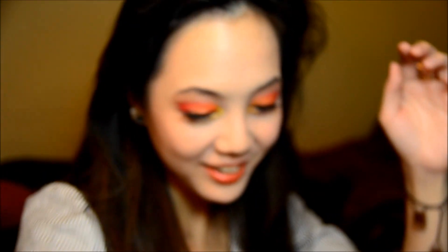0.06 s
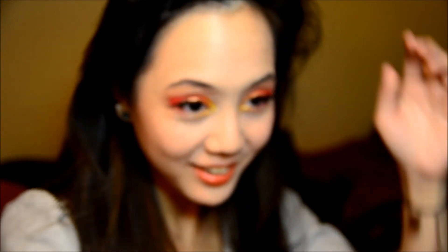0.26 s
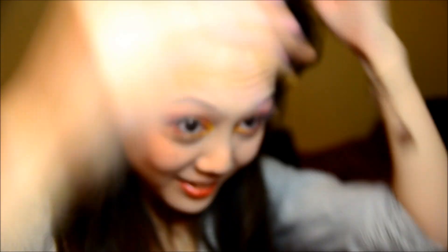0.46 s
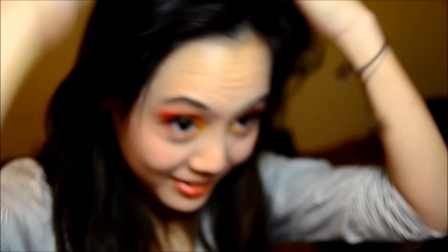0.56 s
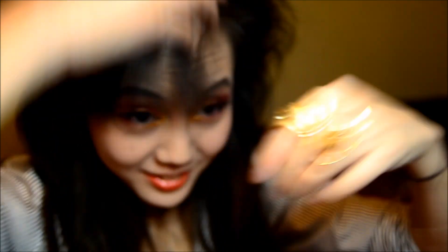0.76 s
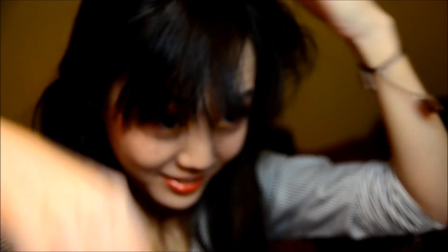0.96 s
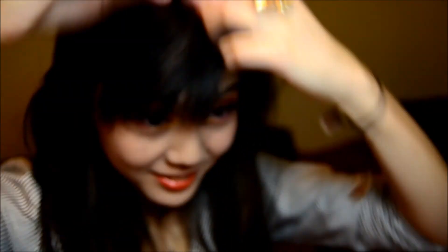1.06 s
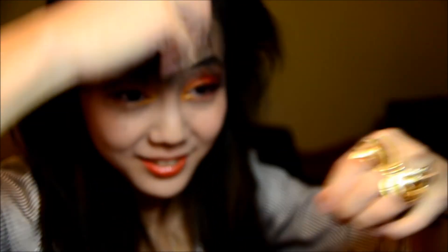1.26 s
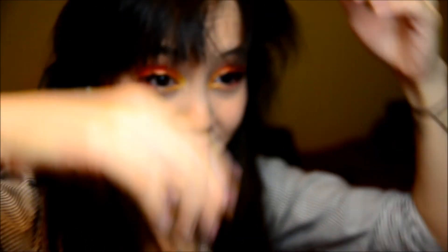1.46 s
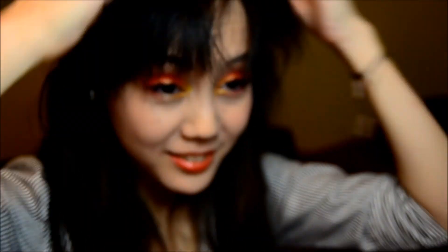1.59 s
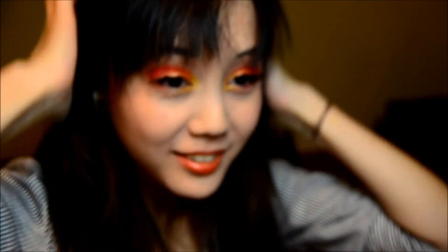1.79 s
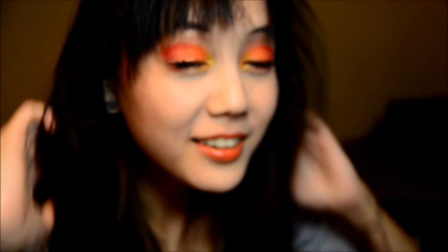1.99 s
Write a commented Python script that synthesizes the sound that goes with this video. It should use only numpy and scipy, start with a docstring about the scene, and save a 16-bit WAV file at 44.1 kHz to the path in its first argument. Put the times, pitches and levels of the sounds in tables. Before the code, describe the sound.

Sharp hard clack of a dropped hair clip, quick uneven clattering with bright ticks, abrupt settling, then near silence with faint hair brushing, low ventilation noise and weak mains hum, picked up by a nearby simple microphone.

```python
"""Hair clip drop and hair swishes

A small spring hair clip snaps open, drops on a hard desk, bounces and rocks to rest near a laptop microphone.
Each blow rings fading tones and adds a noisy knock; short bright noises make the ticks of the teeth.
Hands then sweep through long hair: shaped noise that swells and fades in soft swishes.
Behind it all is a small room with ventilation noise and a wavering mains hum made of sine tones."""
import sys
import numpy as np
from scipy import signal
from scipy.fft import rfft, irfft
from scipy.io import wavfile
from scipy.ndimage import uniform_filter1d

SR = 44100
rng = np.random.default_rng(int(sys.argv[2]) if len(sys.argv) > 2 else 0)


def put_to_file(sound):
    """Save the sound as 16-bit audio at rate SR, in the file named by the first command-line argument."""
    columns = np.atleast_2d(sound).T  # one column per channel
    safe = np.clip(columns, -1, 1)
    whole_steps = np.round(safe * 32767)
    wavfile.write(sys.argv[1], SR, whole_steps.astype(np.int16))


def ratio(d):
    """dB to gain"""
    e = np.asarray(d, float) / 20
    return 10 ** e


N = 89699  # length in samples
T = np.arange(N) / SR  # time in seconds

# Spectrum of the ventilation noise: (frequency [Hz], relative level [dB])
VENTILATION_COLOUR = [(25, -46), (45, -32.5), (80, -16), (130, -10.5), (200, -12.5), (260, -14.5),
                      (400, -9.5), (900, -14), (1650, -19.5), (4500, -30), (8000, -40), (11000, -45),
                      (13500, -52), (16000, -60)]
VENTILATION_DB = -53.5
# Mains hum tones: (frequency [Hz], rms level before wavering [dB])
HUM_TONES = [(48, -73.5), (199, -67), (300.5, -58), (400, -63.5)]
HUM_WAVER_DB = 2

# Loudness of hands brushing through hair: (time [s], level before flicker [dB])
BRUSH_LEVEL = [(.5, -67), (.57, -63.5), (.64, -61.5), (.68, -69), (.74, -73), (.77, -57.5), (.83, -62),
               (.88, -71), (1.01, -72), (1.045, -58.5), (1.09, -60), (1.12, -70), (1.16, -66.5),
               (1.18, -61), (1.22, -77), (1.27, -63.5), (1.31, -63.5), (1.34, -69), (1.45, -88),
               (1.655, -72), (1.685, -61), (1.73, -58), (1.79, -53.5), (1.86, -58), (1.89, -67.5),
               (1.92, -63.5), (1.94, -60.5), (1.97, -65), (2.03, -63)]
# Spectrum of the swishes: (frequency [Hz], relative level [dB])
HAIR_COLOUR = [(600, -0.5), (1500, 0), (3000, 3), (5000, -1), (8000, 2.5), (10500, 0), (13000, -14.5),
               (16000, -17)]
SWISH_FLICKER_DB = 2

SCRAPE_LEVEL = [(.0, -30), (.09, -41), (.14, -52), (.15, -39.5), (.23, -39), (.3, -44), (.35, -56),
                (.36, -39.5), (.45, -40.5), (.52, -59), (.56, -94)]
# Spectrum of the scraping: (frequency [Hz], relative level [dB])
SCRAPE_COLOUR = [(300, -5.5), (750, -11.5), (1100, -0.5), (2000, 2.5), (3500, -8.5), (7000, -17.5),
                 (12000, -32), (16000, -54)]
SCRAPE_FLICKER_DB = 2.4

BLOWS = [(.0005, -40, 1220, 0.0019, -27), (.004, -21.5, 1870, 0.0031, -49),
         (.0144, -12.5, 1200, 0.01, -26.5), (0.0149, -12, 2170, 0.0072, -33),
         (.0148, -16.5, 3300, 0.0045, -57), (.033, -16, 2000, 0.0035, -44), (.037, -27.5, 1141, .048, -37),
         (0.115, -40, 1230, 0.0038, -57), (0.1461, -25, 1757, 0.004, -30.5),
         (0.148, -31, 1340, 0.0028, -56), (0.1895, -31.5, 1920, 0.0018, -34),
         (.199, -27.5, 1330, 0.0028, -53), (.211, -27, 1296, 0.007, -43), (.219, -30.5, 1600, .002, -54),
         (0.2262, -24, 1850, 0.006, -28), (.226, -30, 895, 0.024, -52), (.24, -28.5, 1940, 0.0012, -47),
         (0.267, -28.5, 1600, 0.0059, -52), (0.288, -32.5, 1265, 0.0038, -48),
         (.3082, -35, 1350, 0.0052, -67), (0.326, -37.5, 1310, 0.006, -48),
         (0.3557, -26, 1500, 0.0063, -27.5), (0.365, -28.5, 1420, 0.0034, -54),
         (.362, -29.5, 895, 0.035, -44), (0.378, -30, 1700, 0.0016, -27.5),
         (0.397, -26.5, 1520, 0.0075, -42), (0.411, -23, 1590, 0.009, -43), (.424, -35.5, 1620, 0.004, -48),
         (0.431, -28.5, 1480, 0.0069, -62), (.43, -36, 895, 0.041, -71), (0.45, -26.5, 1450, 0.0039, -32),
         (0.457, -24, 1610, 0.0024, -54), (0.47, -32.5, 1550, 0.0032, -56), (.492, -37, 1680, 0.011, -46.5),
         (0.526, -42, 1540, 0.0075, -68), (0.555, -59, 1580, 0.0036, -69),
         (0.631, -49.5, 1010, 0.0023, -72), (1.654, -61, 2530, 0.0017, -66)]
# Pitch of each mode of clip and desk, before detuning: (frequency [Hz])
MODE_PITCH = [894, 1078, 1155, 1260, 1340, 1470, 1522, 1575, 1655, 1750, 1865, 2070, 2420, 2750, 3200, 4310,
              4650]
# Ringing of each mode, in the same order: (level [dB], fade by 60 dB [s], after-ring level [dB])
MODE_RING = [(-10, 0.054, -11.5), (2, 0.086, -30), (1.5, 0.017, -23), (-1.5, 0.0051, -40),
             (-8.5, 0.014, -22), (-2, 0.04, -25), (-7, 0.033, -24), (-3.5, 0.046, -16.5), (-6, 0.028, -12),
             (-5.5, 0.026, -20), (-3, 0.021, -23), (-3.5, 0.016, -13.5), (4.5, 0.021, -29),
             (-11, 0.1, -18.5), (-10.5, 0.036, -16), (-0.5, 0.016, -43), (-2, 0.025, -29)]
# How far around the struck region the modes sound, and how strong beyond it
REGION_OCTAVES, OUTSIDE_DB = 0.22, -22
ROCKING_S = 0.0044
ATTACK_S = 0.0006  # rise of a blow
SCATTER_DB, DETUNE = 2.5, 0.003  # spread of mode level, and of pitch as a fraction, between blows
AFTER_T60_S = 0.24  # the freed spring rings on, fading by 60 dB in this time

# Spectrum of the knocks: (frequency [Hz], relative level [dB])
KNOCK_COLOUR = [(300, -6.5), (700, -42), (1500, 16.5), (2800, 12), (4600, 1.5), (6500, -9), (10000, -15),
                (16000, -53)]
# Bright ticks of the teeth: (time [s], level before crackle [dB], hold [s])
TICKS = [(.003, -32, 0.0014), (0.0093, -41.5, 0.02), (0.169, -49, 0.016), (0.209, -49, 0.0028),
         (0.261, -47, 0.0072), (0.3564, -25.5, 0.0031), (0.363, -31.5, 0.0041), (0.378, -36.5, 0.0035),
         (0.385, -47.5, 0.03), (0.446, -42.5, 0.0055), (.451, -37.5, 0.00093), (0.47, -46, 0.0035)]
# Spectrum of the ticks: (frequency [Hz], relative level [dB])
TICK_COLOUR = [(2500, -6), (4500, 2.5), (6300, 7.5), (9000, 3.5), (11500, -5.5), (14000, -15), (15500, -26),
               (17000, -40)]
KNOCK_T60_S, TICK_T60_S = 0.02, 0.011  # times to fade by 60 dB
TICK_ATTACK_S, CRACKLE_DB = 0.0002, 4  # rise and grain of the ticks
LOW_CUT_HZ = 250  # the small clip radiates no bass

# Fading of the room's tail: (frequency [Hz], fade by 60 dB [s])
ROOM_FADE = [(1500, 0.28), (5000, 0.36), (9500, 0.38), (14000, 0.19)]
ROOM_DB, ROOM_GAP_S = -10.5, 0.0067

# Narrow dips of the microphone port: (frequency [Hz], width [Hz], gain [dB])
MIC_DIPS = [(5780, 260, -9), (6900, 130, -6)]
TOP_HZ = 15900  # treble limit of the microphone sound


def unit(x):
    """Scale a signal to rms 1."""
    return x / np.sqrt(np.mean(x ** 2))


def hiss(colour):
    """Noise of rms 1, given the spectrum of a (frequency [Hz], level [dB]) table."""
    log_f = np.log(np.fft.rfftfreq(N, 1 / SR) + 1)
    hz, db = np.array(colour).T
    gain = ratio(np.interp(log_f, np.log(hz), db))
    return unit(irfft(rfft(rng.standard_normal(N)) * gain, N))


def walk(rate):
    """Smooth random wandering of rms 1: noise averaged twice over 1/rate seconds."""
    k = int(SR / rate)
    smooth = uniform_filter1d(rng.standard_normal(N), k)
    return unit(uniform_filter1d(smooth, k))


def burst(start_s, hold, t60, attack):
    """Start sample and envelope (one column per t60): quick rise, hold, exponential fade."""
    age = T[:SR // 4, None]
    rise = np.minimum(age / attack, 1)
    fade = np.exp(-np.log(1000) * np.maximum(age - hold, 0) / t60)
    return int(max(start_s, 0) * SR), rise * fade


def ventilation():
    """Steady noise shaped like moving air."""
    return ratio(VENTILATION_DB) * hiss(VENTILATION_COLOUR)


def mains_hum():
    """Sine tones, each wavering in level by itself."""
    hum = np.zeros(N)
    for hz, db in HUM_TONES:
        level = ratio(db + HUM_WAVER_DB * walk(27.4))
        hum += level * np.sqrt(2) * np.sin(2 * np.pi * (hz * T + rng.random()))
    return hum


def hair():
    """Many rubbing hairs make airy noise that swells and fades with the hands."""
    db = np.interp(T, *np.array(BRUSH_LEVEL).T, left=-120)
    return ratio(db + SWISH_FLICKER_DB * walk(42)) * hiss(HAIR_COLOUR)


def scrape():
    db = np.interp(T, *np.array(SCRAPE_LEVEL).T)
    return ratio(db + SCRAPE_FLICKER_DB * walk(326)) * hiss(SCRAPE_COLOUR)


def teeth_ticks():
    """Teeth tick as short bursts of bright, crackling noise."""
    level = np.zeros(N + SR)
    for start_s, db, hold in TICKS:
        i, env = burst(start_s, hold, TICK_T60_S, TICK_ATTACK_S)
        level[i:i + len(env)] += ratio(db) * env[:, 0]
    return level[:N] * ratio(CRACKLE_DB * walk(2500)) * hiss(TICK_COLOUR)


def knocks():
    """The noisy part of each blow, held for half the contact and then fading."""
    level = np.zeros(N + SR)
    for start_s, _, _, contact_s, knock_db in BLOWS:
        i, env = burst(start_s, contact_s / 2, KNOCK_T60_S, ATTACK_S)
        level[i:i + len(env)] += ratio(knock_db) * env[:, 0]
    return level[:N] * hiss(KNOCK_COLOUR)


def ringing():
    """Each blow drives the modes near its region during the contact; then they fade and the spring rings on."""
    hz = np.array(MODE_PITCH)
    mode_db, t60, after_db = np.array(MODE_RING).T
    ring = np.zeros(N + SR)
    for start_s, db, struck_hz, contact_s, _ in BLOWS:
        detune, scatter, phase = rng.standard_normal((3, len(hz)))
        i, env = burst(start_s, contact_s, t60, ATTACK_S)
        env = env + ratio(after_db) * burst(start_s, contact_s, AFTER_T60_S, ATTACK_S)[1]

        # long, rocking contacts narrow the region
        distance = np.log2(hz / struck_hz) / REGION_OCTAVES * max(1, contact_s / ROCKING_S)
        near = np.exp(-distance ** 2) + ratio(OUTSIDE_DB)
        gains = near * ratio(db + mode_db + SCATTER_DB * scatter)
        pitch = hz * (1 + DETUNE * detune)
        tones = np.sin(2 * np.pi * (pitch * T[:len(env), None] + phase))
        sound = (env * tones) @ gains

        # the strength of the blow sets the energy given during the contact
        contact = int((contact_s + ATTACK_S) * SR)
        wanted_power = np.sum(gains ** 2) / 2
        ring[i:i + len(env)] += sound * np.sqrt(wanted_power / np.mean(sound[:contact] ** 2))
    return ring[:N]


def room(x):
    """Diffuse echoes: a tail of noise whose fading time depends on pitch, shortest at the top."""
    t = T[:SR // 2]
    spectrum = rfft(rng.standard_normal(len(t)))
    f = np.fft.rfftfreq(len(t), 1 / SR)
    band = f // 1000  # bands 1 kHz wide
    tail = np.zeros(len(t))
    for k in np.unique(band):
        t60 = np.interp(f[band == k].mean(), *np.array(ROOM_FADE).T)
        tail += irfft(spectrum * (band == k), len(t)) * np.exp(-np.log(1000) * t / t60)
    tail = tail * (t > ROOM_GAP_S)  # silence before the first echo
    tail = tail / np.sqrt(np.sum(tail ** 2))
    return ratio(ROOM_DB) * signal.fftconvolve(x, tail)[:N]


def scene():
    low_cut = signal.butter(2, LOW_CUT_HZ, "high", fs=SR, output="sos")
    clip = signal.sosfilt(low_cut, ringing() + knocks() + teeth_ticks() + scrape())
    mix = clip + room(clip) + hair() + ventilation() + mains_hum()
    return mix[None]  # one channel


def band_limit(x):
    """A steep low-pass at the top of the band."""
    return signal.sosfilt(signal.butter(12, 16120, fs=SR, output="sos"), x)


def record(dry):
    """The microphone port has two narrow dips; a steep filter cuts the top."""
    f = np.fft.rfftfreq(N, 1 / SR)
    dips_db = sum(db * np.exp(-((f - hz) / width) ** 2) for hz, width, db in MIC_DIPS)
    dipped = irfft(rfft(dry) * ratio(dips_db), N)
    top_cut = signal.ellip(8, 0.2, 70, TOP_HZ, fs=SR, output="sos")
    return band_limit(signal.sosfilt(top_cut, dipped))


dry = scene()
out = record(dry)
put_to_file(out)
```